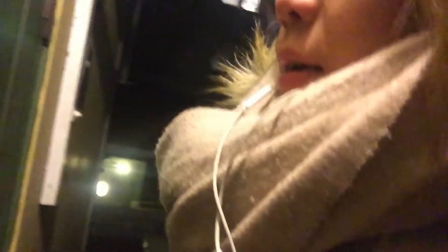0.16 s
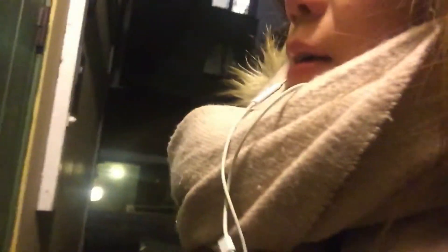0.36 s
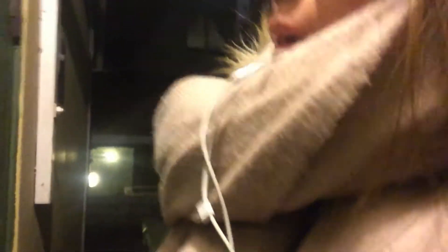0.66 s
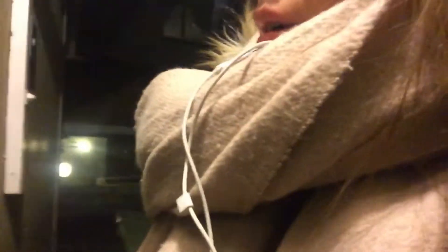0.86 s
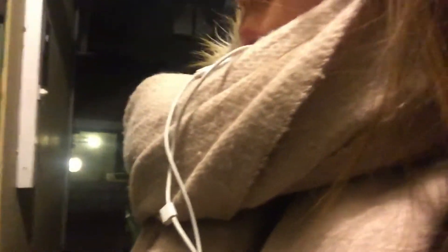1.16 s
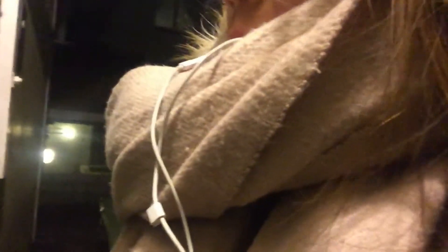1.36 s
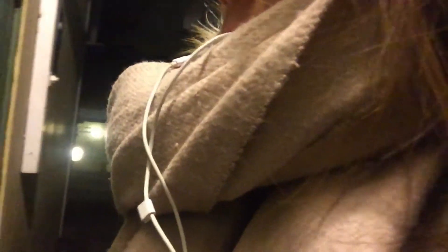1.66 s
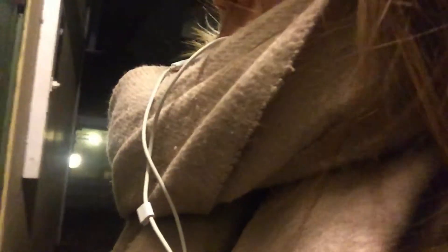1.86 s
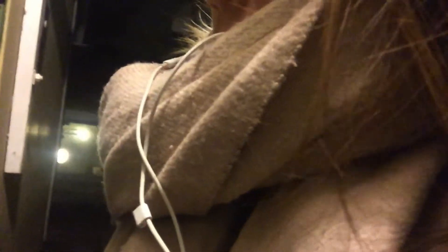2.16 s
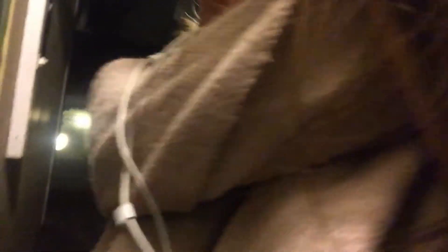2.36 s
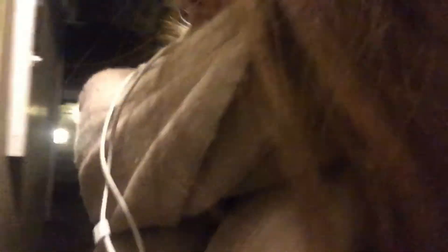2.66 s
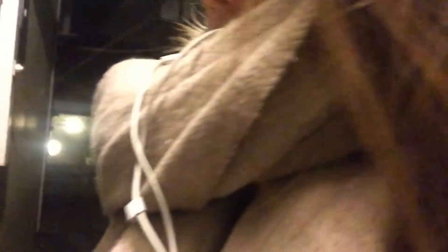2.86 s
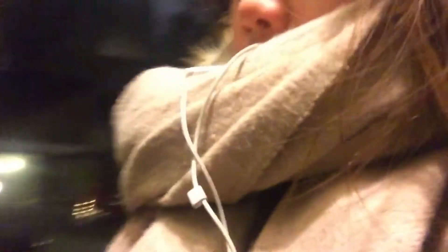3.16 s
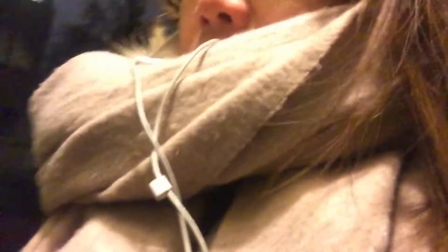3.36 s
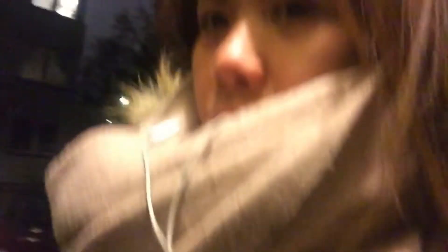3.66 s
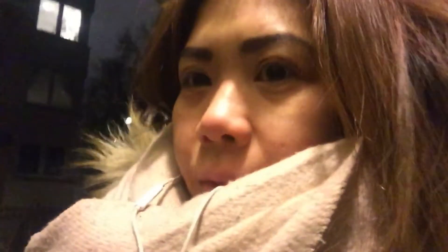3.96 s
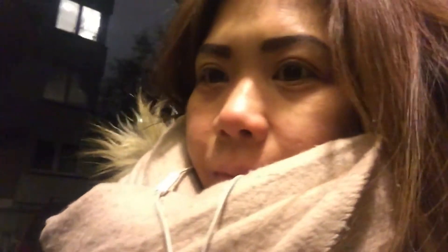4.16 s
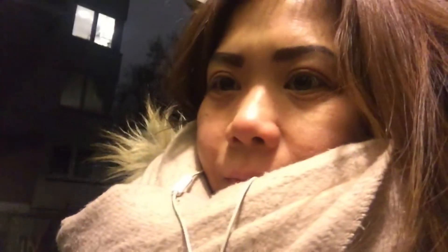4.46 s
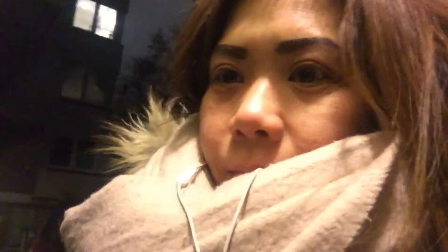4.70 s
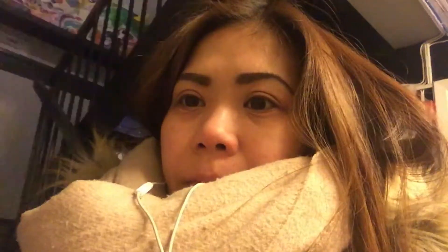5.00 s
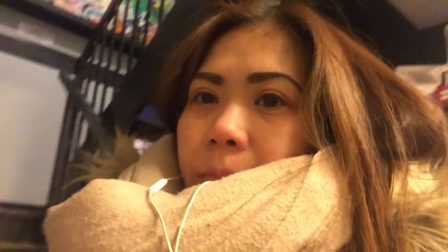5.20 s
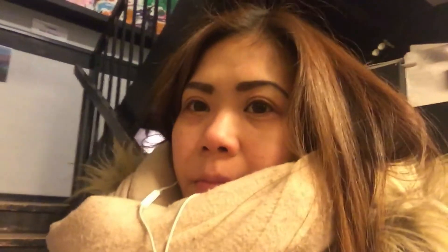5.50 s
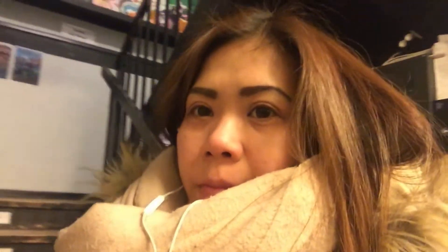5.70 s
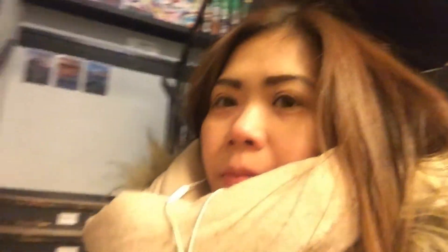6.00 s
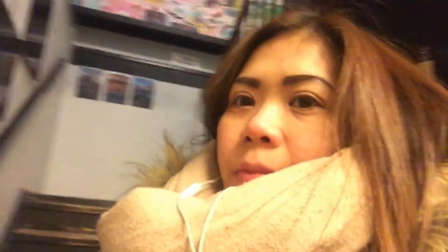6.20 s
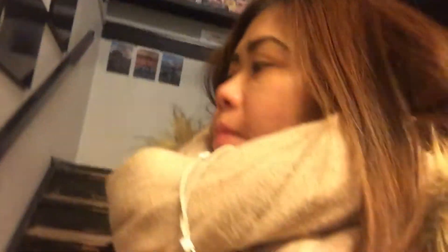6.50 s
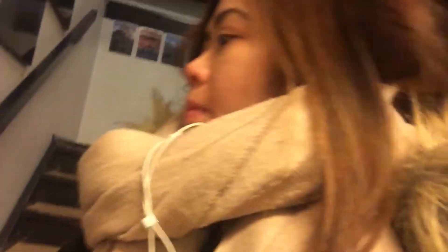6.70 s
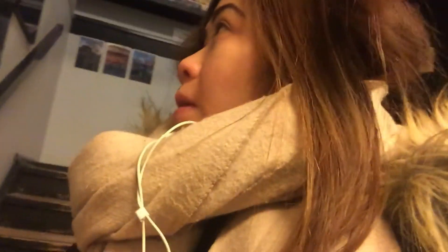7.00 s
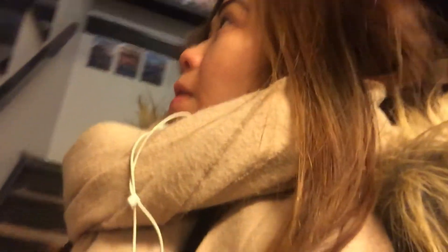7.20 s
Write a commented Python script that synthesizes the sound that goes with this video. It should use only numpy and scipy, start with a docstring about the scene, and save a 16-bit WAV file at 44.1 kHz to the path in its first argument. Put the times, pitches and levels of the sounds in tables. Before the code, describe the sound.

A close microphone outdoors picks up faint street rumble, tyre hiss and, from about 1.2 to 2.7 s, a low distant engine hum. A few light key ticks open, then at 0.6 s a solid woody knock with rattle and a brief scrape. From 1.1 to 2.3 s keys clink and chatter brightly, with a sharp lock clack at 1.44. Hard metallic clacks at 2.52 and 2.65, the loudest, leave a short bolt ring. From 3.0 to 4.2 keys jangle quickly, with a low thump at 3.73, then thin out. After a very short silence at 4.8, a quiet stairwell begins: soft air, a faint falling squeak at 5.05, tiny ticks, and a cluster of latch clicks and small squeaks at 5.7-5.9. Sparse taps, muffled step-like bumps and faint cloth rubs continue to 7.25, with a short dull echo.

```python
"""A bunch of keys clinks and chatters as a hand works it in a front door lock at night: noise and short rings.
The bolt and door knock too, as cracks of noise over ringing modes; soft bumps are sagging tones.
Behind them a street murmurs: shaped noise under a faint engine hum. Then comes a very short silence.
After it we are in a quiet stairwell: a latch, bright ticks, small squeaks, soft steps and cloth.
Both places have a short, dull echo made of fading noise."""
import sys
import numpy as np
from scipy import signal
from scipy.fft import rfft, irfft
from scipy.io import wavfile
from scipy.ndimage import uniform_filter1d

SR = 44100
rng = np.random.default_rng(int(sys.argv[2]) if len(sys.argv) > 2 else 0)


def generate_wav(sig):
    """Save sig (samples, or channels by samples) to the path in sys.argv[1] as 16-bit PCM at SR."""
    pcm = np.round(np.clip(np.atleast_2d(sig).T, -1, 1) * 32767).astype(np.int16)
    wavfile.write(sys.argv[1], SR, pcm)


N = 324038
TIME = np.arange(N) / SR


def undb(db):
    """Turns decibels into a factor for the wave."""
    return 10 ** (np.asarray(db) / 20)


def rms_one(x):
    """Scales a sound to an average strength (rms) of 1."""
    return x / np.sqrt(np.mean(x ** 2))


def peak_at(x, db):
    """Scales the loudest 3 ms to a level."""
    return x * undb(db) / np.sqrt(np.max(uniform_filter1d(x ** 2, size=128)))


def fade(t, t60):
    """Dies away by 60 dB in t60 seconds, as ringing things do; t60 is kept within 0.004 to 2 s."""
    return np.exp(-np.log(1000) * t / np.clip(t60, .004, 2))


def build_up(t, rise_s):
    """Softens the start, since a thing needs a moment to get moving."""
    return 1 - np.exp(-t / rise_s)


def add(track, s, sound):
    """Mixes a sound into the track at a time."""
    i = int(s * SR)
    track[i:i + len(sound)] += sound[:N - i]


def hiss_like(t):
    """Plain random noise, as long as t."""
    return rng.standard_normal(len(t))


def wobble(size, smooth):
    """Smoothed random ups and downs, rms 1; smooth is in samples."""
    return rms_one(uniform_filter1d(rng.standard_normal(size), size=smooth))


def noise(colour, size=N):
    """Noise whose spectrum follows (frequency [Hz], level [dB]) points, rms 1."""
    hz, db = np.transpose(colour)
    bins = np.arange(size // 2 + 1) * SR / size + 1
    shape = undb(np.interp(np.log(bins), np.log(hz), db))
    return rms_one(irfft(rfft(rng.standard_normal(size)) * shape, size))


def band(x, lo_hz, hi_hz):
    """Keeps the pitches between two limits."""
    return signal.sosfilt(signal.butter(2, [lo_hz, hi_hz], "bandpass", fs=SR, output="sos"), x)


def walk(rate):
    """Random levels, each held for 1 / rate seconds, with smooth slides between them."""
    k = int(SR / rate)
    held = np.repeat(rng.standard_normal(N // k + 1), k)
    return 1.72 * uniform_filter1d(held, k)[:N]


def ring(hz, db, t60, t, scatter_db, detune):
    """Decaying modes; each blow lands elsewhere and is held otherwise, so strength, pitch and phase vary."""
    luck = rng.standard_normal((len(hz), 3))
    gain = undb(db + scatter_db * luck[:, 0])
    pitch = hz * (1 + detune * luck[:, 1])
    wave = np.sin(2 * np.pi * np.outer(pitch, t) + np.pi * luck[:, 2:])
    return gain @ (wave * fade(t, np.reshape(t60, (-1, 1))))


def echo(x, t60, db, top_hz):
    """Many blurred reflections: a dull tail of fading noise, its treble falling above top_hz."""
    t = np.arange(SR) / SR
    tail = noise([(100, 0), (top_hz, 0), (16000, -18)], size=SR) * fade(t, t60) * build_up(t, 0.002)
    return undb(db) * signal.fftconvolve(x, tail / np.sqrt(np.sum(tail ** 2)))[:N]


# Engine hum: (time [s], pitch [Hz], level [dB])
ENGINE_HUM = [(1.2, 66.4, -56), (1.546, 65.76, -47.5), (2.044, 76.7, -51.5), (2.65, 80.2, -47)]


def engine_hum():
    """A distant engine: one low tone whose pitch and level waver."""
    when, hum_hz, hum_db = np.transpose(ENGINE_HUM)
    pitch = np.interp(TIME, when, hum_hz) * (1 + 0.024 * walk(13))
    # silent (-90 dB) before the first point and after the last
    swell = undb(np.interp(TIME, when, hum_db, left=-90, right=-90) + 2.2 * walk(10))
    return np.sqrt(2) * uniform_filter1d(swell, size=4096) * np.sin(2 * np.pi * np.cumsum(pitch) / SR)


# Traffic murmur: (time [s], rumble level [dB], tyre hiss level [dB], treble of the hiss [dB])
TRAFFIC = [(0, -46.5, -51.5, -2), (.4, -48, -54, -0.5), (1.7, -47.5, -53, -2), (2.5, -47, -52, -1),
           (3.8, -49, -51, -1.5), (4.8, -52.5, -55, -4.5)]
# Spectrum of the murmur: (frequency [Hz], level per Hz [dB])
TRAFFIC_COLOUR = [(15, -42), (25, -17), (64, 3.5), (180, -5), (354, -16), (405, -14.5), (503, -20),
                  (1190, -17.5), (2410, -30.5), (2610, -32), (4870, -43), (5280, -40.5), (10100, -49),
                  (15300, -48.5), (16000, -58)]


def street():
    """Traffic noise: rumble and tyre hiss swell on their own; the hiss wavers band by band."""
    s, rumble_db, hiss_db, treble_db = np.transpose(TRAFFIC)
    far = noise(TRAFFIC_COLOUR)
    low = signal.sosfiltfilt(signal.butter(2, 400, fs=SR, output="sos"), far)
    rumble = rms_one(low) * undb(np.interp(TIME, s, rumble_db) + 2.0 * walk(19))
    hiss = far - low
    for hz in (588.6, 750, 944, 1080, 1272, 1506, 1820, 2200):
        hiss = hiss + (undb(3.2 * walk(18)) - 1) * band(far, hz * .94, hz * 1.06)
    treble = signal.sosfiltfilt(signal.butter(2, 3500, "highpass", fs=SR, output="sos"), far)
    hiss = hiss + (undb(np.interp(TIME, s, treble_db)) - 1) * treble
    hiss = rms_one(hiss) * undb(np.interp(TIME, s, hiss_db) + 1.3 * walk(4))
    return rumble + engine_hum() + hiss


# Spectrum of the stairwell air: (frequency [Hz], level per Hz [dB])
AIR_COLOUR = [(15, -18), (25, 8.5), (120, 2), (734, -9.5), (863, -6), (1020, -5), (1480, -8), (2050, -8.5),
              (2550, -11.5), (2990, -13), (4370, -16), (15300, -28.5), (16000, -41)]
AIR_DB = -63


def stairwell_air():
    """The quiet of the stairwell: soft shaped noise with a slightly wavering level."""
    return undb(AIR_DB + 1.2 * walk(6)) * noise(AIR_COLOUR)


# Strokes of metal and cloth: (start [s], strongest [s], end [s], rub level [dB], rumble level [dB])
# A row that ends before it starts makes no sound.
STROKES = [(0.618, 0.627, 0.76, -35, -25.5), (2.66, 2.69, 2.53, -45, -48), (3.038, 3.065, 3.23, -42, -36),
           (5.467, 5.51, 5.68, -58, -46), (5.698, 5.778, 6.1, -48, -53), (6.345, 6.384, 6.33, -55, -62.5),
           (6.46, 6.53, 6.55, -53.5, -54.5), (6.888, 6.925, 7.6, -74, -54),
           (7.106, 7.185, 7.25, -58.5, -63)]
# Spectra of rub and rumble: (frequency [Hz], level per Hz [dB])
FRICTION_COLOUR = [(200, 8), (600, 3.5), (1800, -6.5), (4000, -6.5), (8000, -14), (15000, -25.5)]
SHAKEN_WOOD_COLOUR = [(25, -17), (55, 1), (150, -5), (350, -12.5), (700, -24.5), (2000, -51)]
STROKE_START_DB, STROKE_END_DB = -9, -18  # below the strongest moment


def rubbing():
    """Uneven friction noise over a rumble of shaken wood; each stroke swells and dies away."""
    gain = np.zeros((2, N))
    for start, top, end, rub_db, rumble_db in STROKES:
        inside = (TIME >= start) & (TIME <= end)
        shape_db = np.interp(TIME[inside], [start, top, end], [STROKE_START_DB, 0, STROKE_END_DB])
        gain[:, inside] = undb(shape_db + np.array([[rub_db], [rumble_db]]))
    rub_gain, rumble_gain = uniform_filter1d(gain, size=128)
    uneven = undb(0.75 * walk(150) + 1.2 * walk(40))
    return noise(FRICTION_COLOUR) * uneven * rub_gain + noise(SHAKEN_WOOD_COLOUR) * rumble_gain


# Thin squeaks: (time [s], length [s], start pitch [Hz], end pitch [Hz], level [dB])
SQUEAK_EVENTS = [(5.045, .23, 1790, 1735, -57), (5.668, 0.04, 4750, 4710, -58),
                 (5.66, 0.05, 4350, 4350, -58), (5.712, 0.029, 10340, 10470, -46),
                 (5.743, 0.053, 11000, 11200, -48), (6.894, 0.042, 1897, 1915, -55),
                 (6.922, 0.085, 2456, 2466, -63)]


def squeaks():
    """Rubbing parts stick and slip, so pitch trembles and level throbs while each squeak dies away."""
    out = np.zeros(N)
    for s, length, start_hz, end_hz, db in SQUEAK_EVENTS:
        size = int(length * SR)
        tremble = 1 + 0.14 * uniform_filter1d(rng.standard_normal(size), size=40)
        hz = np.linspace(start_hz, end_hz, size) * tremble
        throb = 1 + .45 * rms_one(band(rng.standard_normal(size), 30, 70))
        shape = signal.windows.tukey(size, .4) * undb(np.linspace(0, -8.0, size)) * throb
        add(out, s, undb(db) * shape * np.sin(2 * np.pi * np.cumsum(hz) / SR))
    return out


# Small hard parts indoors: (time [s], peak level [dB], ring pitch [Hz])
TICK_EVENTS = [(5.1905, -53, 2495), (5.1994, -42, 2590), (5.204, -39.5, 2666), (5.328, -57, 3000),
               (5.444, -60, 3110), (5.48, -38.5, 7000), (5.5965, -51.5, 8740), (5.7063, -40, 2090),
               (5.715, -29.5, 5300), (5.727, -42, 5300), (5.7818, -35.5, 5200), (5.789, -36, 5870),
               (5.812, -39, 5270), (5.833, -38, 5100), (6.01, -51, 3180), (6.363, -46, 4530),
               (6.4779, -45.5, 3410), (7.0825, -58.5, 4440)]
SNAP_T60_S, TICK_RING_T60_S = 0.017, 0.0097


def ticks():
    """Small hard parts touch: a bright snap of noise with one short ring."""
    out, t = np.zeros(N), np.arange(4096) / SR
    for s, tick_db, hz in TICK_EVENTS:
        snap = band(hiss_like(t) * fade(t, SNAP_T60_S), 2500, 12500)
        tone = np.sin(2 * np.pi * hz * t) * fade(t, TICK_RING_T60_S)
        add(out, s, peak_at(peak_at(snap, -3.0) + peak_at(tone, 0), tick_db))
    return out


# Dull bumps and taps: (time [s], peak level [dB], pitch [Hz], t60 [s])
BUMP_EVENTS = [(0.2, -34.5, 118, 0.45), (0.63, -16.5, 144, 0.14), (0.63, -21.5, 300, 0.1),
               (0.66, -17, 55, 0.1), (0.7, -20, 54, 0.15), (2.658, -34.5, 142, 0.31),
               (2.864, -39, 365, 0.044), (3.046, -29, 124, 0.16), (2.95, -31, 110, 0.051),
               (3.734, -17, 123, 0.087), (4.69, -27.5, 440, 0.0035), (5.46, -39.5, 145, 0.17),
               (5.495, -39.5, 340, 0.06), (5.803, -46, 96.8, 0.53), (6.086, -51, 970, 0.03),
               (6.522, -46.5, 100, 0.16), (6.904, -33, 120.6, 0.065), (7.2, -38, 95, 0.07),
               (7.034, -45.5, 130, 0.16), (7.054, -38, 95, 0.078), (7.119, -48.5, 200, 0.13),
               (6.901, -43, 383, 0.11), (7.163, -43.5, 575, 0.064), (7.195, -53, 490, 0.097),
               (6.522, -45.5, 274, .15), (6.61, -49.5, 1480, 0.029), (5.97, -44, 194, 0.063),
               (6.366, -53.5, 800, 0.077), (6.822, -55, 300, 0.074), (2.658, -20, 340, 0.06)]


def bumps():
    """A soft thing lands: a tone that sags, with a weaker neighbour; it builds up over part of a cycle."""
    out, t = np.zeros(N), np.arange(16384) / SR
    for s, peak_db, hz, t60 in BUMP_EVENTS:
        sag = 1 + 0.48 * np.exp(-t * hz / 1.3)
        tone = np.sin(2 * np.pi * hz * t * sag) + 0.32 * np.sin(2 * np.pi * 1.7 * hz * t)
        add(out, s, peak_at(tone * fade(t, t60) * build_up(t, 0.23 / hz), peak_db))
    return out


# Modes of the panel, levels and t60 before knock() adapts them: (frequency [Hz], level [dB], t60 [s])
WOOD_MODES = [(150, -16, 0.87), (344.5, -5.5, 0.27), (552, -22.5, 0.13), (730, -30, 0.067),
              (930, -34.5, 0.068), (1010, -35.5, 0.069), (1240, -38, 0.14), (1290, -34, 0.11),
              (1384, -10, 0.0052), (1450, -29.5, 0.059), (1680, -36, 0.52)]


def knock(clack_db, clack_hz, panel_db, t60):
    """A gritty crack with one leading resonance; the panel under it answers a little later."""
    t = np.arange(8192) / SR
    # loose parts bounce, so the tail of the crack comes in lumps
    lumps = undb(3.0 * np.tanh(t / .004) * wobble(len(t), 80))
    grit = hiss_like(t) * lumps * fade(t, t60) * build_up(t, 0.00053)
    broad = band(band(grit, 760, min(2.41 * clack_hz, 7000)), 300, min(3.0 * clack_hz, 7000))
    leading = band(grit * fade(t, t60), .8 * clack_hz, 1.25 * clack_hz)
    clack = peak_at(broad, -3.0) + peak_at(leading, 0)
    hz, db, ring_t60 = np.transpose(WOOD_MODES)
    wood = ring(hz, 0.68 * db, np.minimum(ring_t60, 0.47 * t60), t, 0.72, 0.053) * build_up(t, 0.0016)
    rattle = band(hiss_like(t), 230, 930) * fade(t, 1.4 * t60)
    panel = peak_at(wood, 0) + peak_at(rattle, 0.061)
    return peak_at(clack, clack_db) + peak_at(panel, panel_db)


# Blows on lock, door, latch and stairs:
# (time [s], clack peak level [dB], clack pitch [Hz], panel peak level [dB], t60 [s])
BLOWS = [(0.038, -38.5, 1470, -48, 0.018), (0.202, -49.5, 1900, -39.5, 0.11),
         (0.624, -16.5, 1450, -14.5, 0.083), (0.638, -33, 3500, -38, 0.03), (0.651, -37, 1230, -39, 0.04),
         (0.672, -41, 1600, -49, 0.034), (0.69, -31, 1650, -46, 0.053), (0.705, -30.5, 1700, -44, 0.037),
         (0.718, -34, 2890, -34, 0.036), (0.724, -30.5, 1110, -38, 0.079), (0.746, -40, 1430, -47, 0.054),
         (1.349, -37.5, 1610, -43, 0.04), (1.359, -51, 2140, -40.5, 0.079), (1.416, -45, 2320, -50, 0.061),
         (1.437, -18, 1680, -35, 0.032), (1.445, -21.5, 1600, -24, 0.039), (1.471, -50, 2700, -36.5, 0.085),
         (1.56, -36.5, 1590, -43, 0.13), (1.582, -27, 1740, -27.5, 0.059), (1.842, -41, 1420, -41.5, 0.094),
         (1.996, -43.5, 1430, -45, 0.056), (2.024, -46, 1540, -38.5, 0.073),
         (2.116, -35.5, 4700, -49, 0.033), (2.424, -36, 1560, -39, 0.037),
         (2.523, -17.5, 1510, -27.5, 0.079), (2.528, -16, 4050, -24, 0.043), (2.535, -23, 1500, -24.5, 0.1),
         (2.558, -32, 1266, -29.5, 0.028), (2.628, -31.5, 1230, -58, 0.2),
         (2.636, -31.5, 4200, -37.5, 0.043), (2.653, -9.5, 3630, -21.5, 0.037),
         (2.655, -12, 1540, -22, 0.046), (2.664, -24, 1060, -17.5, 0.057), (2.692, -43, 2620, -34, 0.042),
         (2.855, -34, 2050, -46, 0.049), (3.005, -40.5, 1800, -50, 0.063), (3.046, -31, 1290, -27.5, 0.11),
         (3.07, -31.5, 1620, -36, 0.1), (3.087, -34, 1650, -43, 0.066), (3.104, -30.5, 1420, -33.5, 0.069),
         (3.27, -41.5, 3570, -49, 0.037), (3.332, -33.5, 4200, -62, 0.011), (3.526, -49, 4670, -64, 0.085),
         (3.571, -41.5, 4700, -61.5, 0.12), (3.717, -36.5, 2455, -43.5, 0.1),
         (5.442, -54.5, 2970, -63, 0.052), (5.478, -47, 3900, -49.5, 0.12),
         (5.494, -38, 1730, -41.5, 0.069), (5.707, -42, 2150, -47.5, 0.068),
         (5.712, -35.5, 1920, -50, 0.089), (5.726, -37.5, 2180, -41, 0.059),
         (5.783, -33.5, 2300, -49, 0.078), (5.79, -29, 1850, -45, 0.07), (5.805, -37, 2330, -60, 0.054),
         (5.819, -37, 2050, -61, 0.033), (5.834, -29, 1540, -37, 0.05), (5.835, -32.5, 2340, -59, 0.057),
         (5.852, -46, 2260, -43.5, 0.03), (5.866, -54.5, 2450, -48.5, 0.051),
         (6.01, -58.5, 3150, -72, 0.057), (6.085, -51, 1970, -48, 0.044), (6.092, -50.5, 1894, -47, 0.054),
         (6.362, -50, 2446, -57.5, 0.068), (6.411, -60, 1850, -52, 0.036),
         (6.478, -46.5, 3064, -48.5, 0.049), (6.501, -49, 1260, -56, 0.052), (6.519, -48, 1250, -40, 0.053),
         (6.534, -50, 1200, -42.5, 0.1), (6.9, -61.5, 1826, -51.5, 0.052),
         (7.083, -59.5, 4330, -60.5, 0.04), (7.158, -58.5, 2076, -46, 0.041),
         (7.172, -58, 1466, -47, 0.055), (7.19, -62, 2090, -56, 0.053)]


def knocks():
    """Hard parts hit each other, outdoors and in the stairwell; each blow is one knock."""
    out = np.zeros(N)
    for s, *blow in BLOWS:
        add(out, s, knock(*blow))
    return out


# Blows that leave the bolt free to ring: (time [s], peak level [dB])
BOLT_BLOWS = [(2.523, -52), (2.654, -43.5)]
# Modes of the bolt: (frequency [Hz], level [dB], t60 [s])
BOLT_TONES = [(4500, -14.5, 0.53), (5825, 1.5, 0.2), (6040, 0, 0.33), (3020, -5.5, 0.4), (7181, -4, 0.6),
              (7418, -8, 0.3), (8032, -10, 0.32), (8990, -7.5, 0.2), (10280, -21, 0.29), (11460, -16, 0.21)]


def bolt():
    """The freed bolt rings in its metal modes, and being loose it flutters."""
    out, t = np.zeros(N), np.arange(16384) / SR
    hz, mode_db, t60 = np.transpose(BOLT_TONES)
    for s, db in BOLT_BLOWS:
        flutter = undb(3.5 * walk(150)[:len(t)])
        add(out, s, peak_at(ring(hz, mode_db, t60, t, 1.3, 0.0016) * flutter, db))
    return out


# Keys sliding on each other until the hand stops them:
# (start [s], end [s], level [dB], brightness [dB per octave])
SLIDES = [(1.13, 1.165, -55, -6), (1.164, 1.207, -53.5, -4), (1.205, 1.24, -60, -4), (1.236, 1.26, -41, 15),
          (1.269, 1.365, -53, 0.5), (1.369, 1.395, -43, 11), (1.444, 1.495, -51.5, -3),
          (2.116, 2.14, -50, 13), (2.165, 2.197, -56.5, -9), (2.326, 2.359, -62, 3.5),
          (3.047, 3.126, -45.5, -5), (3.26, 3.365, -49.5, -2), (3.333, 3.35, -44, 1),
          (3.361, 3.403, -46.5, 6), (3.407, 3.502, -69, -1), (3.503, 3.546, -49, 4.5),
          (3.523, 3.591, -32, 10.5), (3.599, 3.623, -41, 5.5), (3.62, 3.7, -63, -2),
          (3.696, 3.772, -45, -1), (3.778, 3.866, -39.5, 2), (3.862, 3.885, -60.5, -4),
          (3.882, 3.92, -48.5, -1.5), (3.92, 3.944, -49.5, -4), (3.979, 4.059, -55, -8)]
# Modes of the keys, levels before chatter() and clinks() flatten them: (frequency [Hz], level [dB])
KEY_TONES = [(4290, -19), (4870, -13), (5630, -13), (6220, -10), (6420, -10), (8040, -9), (8800, -5),
             (9940, -11), (10900, -11), (11900, -8), (12200, -4), (13600, 0), (13900, -1), (14500, -3),
             (15200, -11)]
CONTACTS_PER_S = 6000


def chatter():
    """Thousands of tiny contacts a second, in clusters; now one key, now another takes the ring."""
    out = np.zeros(N)
    for start, end, level_db, tilt_db in SLIDES:
        size = int((end - start) * SR)
        hits = rng.random(size) < CONTACTS_PER_S / SR
        contacts = hits * undb(1.4 * rng.exponential(size=size)) * rng.standard_normal(size)
        contacts = contacts * undb(2.0 * wobble(size, 120))  # clusters
        contacts = contacts * signal.windows.tukey(size, .15) * np.linspace(1, .35, size)
        contacts = np.append(contacts, np.zeros(1024))  # room to ring out
        bright = rms_one(band(contacts, np.clip(5500 * undb(tilt_db), 2500, 11000), 16500))
        scrape = rms_one(band(contacts, 1600, 6500))  # duller, weaker when the slide is bright
        burst = 1.6 * bright + undb(-2 - 0.66 * tilt_db) * scrape
        for hz, db in KEY_TONES:
            turn = undb(4.0 * wobble(len(contacts), 300))
            hz = hz * (1 + 0.034 * rng.standard_normal())
            key_db = .3 * db - 6.0 + tilt_db * np.log2(hz / 1e4)
            burst = burst + undb(key_db) * rms_one(band(contacts * turn, hz - 260, hz + 260))
        add(out, start, rms_one(burst) * undb(level_db))
    return out


# Keys that swing free after a touch: (time [s], pitch [Hz], peak level [dB], t60 [s])
SWINGING_KEYS = [(1.169, 8800, -37, 0.038), (1.297, 10900, -46, .05), (1.314, 5600, -45, .06),
                 (2.116, 6200, -32, 0.021), (2.171, 8780, -54, 0.098), (2.324, 8800, -40.5, 0.04),
                 (2.324, 6300, -43, 0.031), (1.476, 14400, -41, 0.045), (1.478, 9100, -42, 0.048),
                 (1.478, 2710, -45, 0.054), (1.478, 5970, -45, 0.049), (3.526, 6400, -47, .05),
                 (3.538, 4870, -42.5, 0.065), (3.538, 5530, -43, .07), (3.572, 8850, -37, 0.05),
                 (3.603, 4850, -40, 0.034), (3.723, 8900, -39.5, 0.1), (3.745, 6420, -47, 0.067),
                 (3.723, 6450, -42, .07), (3.789, 8080, -39, .06), (3.79, 12100, -36, 0.064),
                 (3.839, 8820, -30.5, 0.044), (4.063, 9430, -57, 0.16), (4.063, 8800, -63, .12),
                 (4.063, 15500, -54, 0.092)]


def free_keys():
    """A key that nothing holds rings on as one pure tone."""
    out, t = np.zeros(N), np.arange(4096) / SR
    for s, hz, db, t60 in SWINGING_KEYS:
        tone = np.sin(2 * np.pi * hz * t) * fade(t, t60) * build_up(t, 0.00051)
        add(out, s, peak_at(tone, db))
    return out


# Keys striking each other: (time [s], peak level [dB], loudest ring [Hz])
KEY_STRIKES = [(0.0376, -40.5, 4170), (0.0843, -33.5, 13300), (0.6394, -34, 4200), (0.6888, -43, 6000),
               (0.748, -46, 6800), (1.1246, -37.5, 5560), (1.1404, -48, 13800), (1.169, -34.5, 8800),
               (1.239, -34.5, 13400), (1.2655, -37, 14000), (1.297, -36, 13700), (1.314, -29.5, 13300),
               (1.324, -27.5, 14000), (1.3738, -29.5, 13900), (1.438, -23, 7470), (1.4472, -28.5, 4400),
               (1.4708, -32, 9500), (1.4752, -24, 13300), (1.517, -57, 6000), (1.5756, -33.5, 5750),
               (1.58, -41, 4570), (1.9952, -36, 10900), (2.074, -33.5, 13300), (2.1151, -24.5, 13730),
               (2.1354, -39, 13300), (2.17, -59, 8780), (2.2084, -49.5, 8700), (2.2567, -36, 14300),
               (2.3218, -34.5, 14200), (2.524, -16.5, 11500), (2.527, -21.5, 6140), (2.5596, -36, 4470),
               (2.628, -43, 7500), (2.634, -49, 9840), (2.6527, -15, 4280), (2.657, -14.5, 6700),
               (2.8023, -51, 4800), (2.936, -56.5, 11560), (2.984, -56.5, 5200), (3.0447, -31.5, 3970),
               (3.0598, -34, 14100), (3.0756, -35, 4570), (3.0999, -23.5, 12200), (3.122, -43, 11800),
               (3.197, -46.5, 9000), (3.233, -49, 12200), (3.266, -43, 9010), (3.299, -38, 13100),
               (3.3, -37.5, 4340), (3.3245, -50, 5960), (3.3299, -28.5, 7040), (3.3643, -23.5, 12650),
               (3.4147, -38, 15000), (3.4516, -51, 12400), (3.526, -28.5, 13600), (3.5374, -34, 13800),
               (3.5565, -38, 13500), (3.603, -26.5, 14200), (3.631, -53, 14400), (3.7055, -31.5, 11000),
               (3.723, -28, 14500), (3.7462, -38, 6270), (3.7886, -32, 8200), (3.819, -31, 8800),
               (3.8403, -28, 8800), (3.885, -33.5, 8200), (3.923, -32.5, 8970), (3.9843, -47, 5400),
               (4.013, -50.5, 6450), (4.0328, -35.5, 10800), (4.0625, -37, 9540), (4.111, -45, 10200),
               (4.179, -43.5, 10000), (4.2215, -31.5, 9600), (4.2389, -44, 11050), (4.772, -47.5, 13130)]
# a light touch leaves a key ringing; a hard blow presses it into the fingers:
# above LIGHT_DB the ring halves every HALVES_DB
KEY_T60_S, LIGHT_DB, HALVES_DB = 0.023, -26.5, 39.5


def clinks():
    """A tick, a ping from the struck key and short modes of its neighbours, all damped by the fingers."""
    out, t = np.zeros(N), np.arange(4096) / SR
    hz, db = np.transpose(KEY_TONES)
    for s, peak_db, lead_hz in KEY_STRIKES:
        t60 = KEY_T60_S * 2 ** (-max(peak_db - LIGHT_DB, 0) / HALVES_DB)
        # modes far from the struck one are hardly reached
        reach_db = -5.0 * np.abs(np.log2(hz / lead_hz))
        bunch = ring(hz, .4 * db + reach_db, np.full(len(hz), .9 * t60), t, 8.0, .03)
        ping = band(hiss_like(t) * fade(t, t60), .95 * lead_hz, 1.05 * lead_hz)
        # the touch stutters, so its fading comes in lumps
        lumps = undb(4.0 * wobble(len(t), 60))
        tick = band(hiss_like(t) * lumps, max(.45 * lead_hz, 3000), min(2.2 * lead_hz, 16500))
        tick = tick * fade(t, .7 * t60)
        clink = peak_at(bunch, 0) + peak_at(ping, -3.0) + peak_at(tick, -2.0)
        add(out, s, peak_at(clink, peak_db))
    return out


STREET_ENDS_S, HALL_STARTS_S = 4.803, 4.842


def scene():
    """The street door first, then a very short silence, then the stairwell."""
    things = rubbing() + bumps() + knocks() + bolt() + chatter() + free_keys() + clinks()
    outside = np.clip((STREET_ENDS_S - TIME) / .004, 0, 1)
    inside = np.clip((TIME - HALL_STARTS_S) / .002, 0, 1)
    porch = things + echo(things, 0.17, -18.5, 3000) + street()
    stairs = things + echo(things * inside, 0.35, -13.0, 2300) + stairwell_air()
    stairs = stairs + ticks() + squeaks()  # close and dry, so no echo
    return (outside * porch + inside * stairs)[None]


def record(dry):
    """Drops the deepest bass, rounds the loudest peaks and cuts the top."""
    thin = signal.sosfilt(signal.butter(3, 33, "highpass", fs=SR, output="sos"), dry)
    return signal.sosfilt(signal.ellip(10, .2, 80, 15900, fs=SR, output="sos"), np.tanh(thin))


dry = scene()
out = record(dry)
generate_wav(out)
```